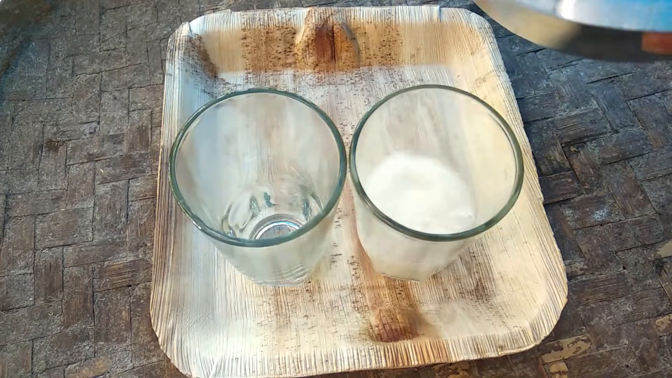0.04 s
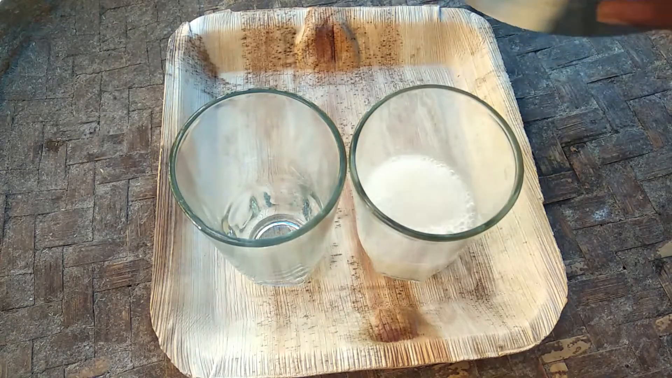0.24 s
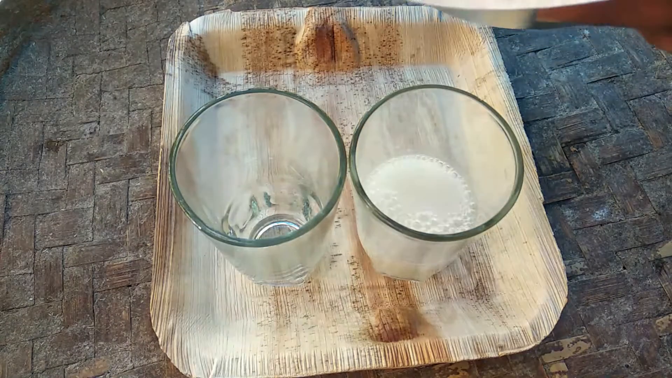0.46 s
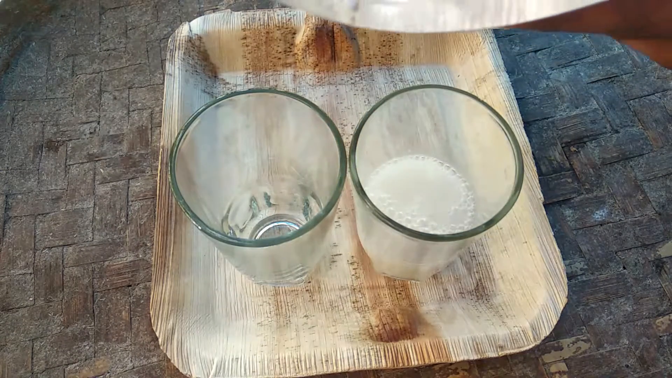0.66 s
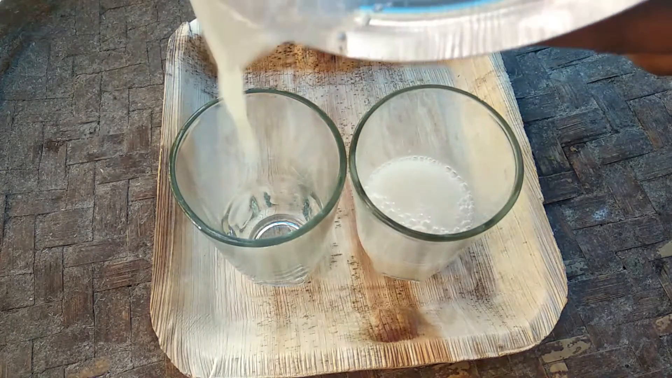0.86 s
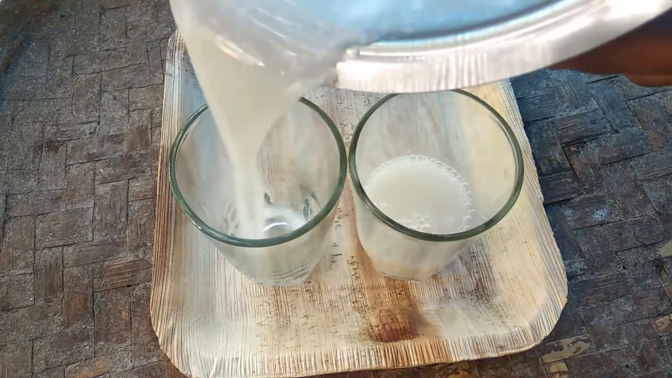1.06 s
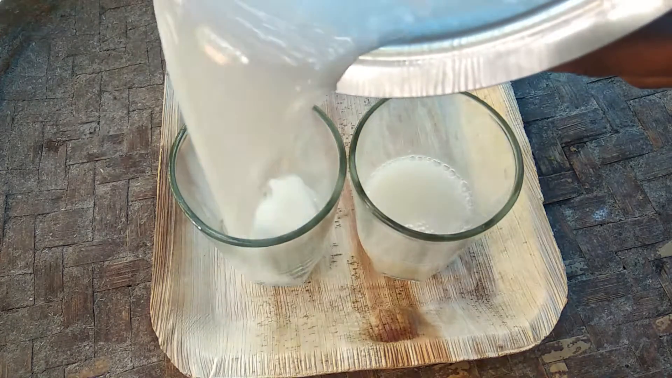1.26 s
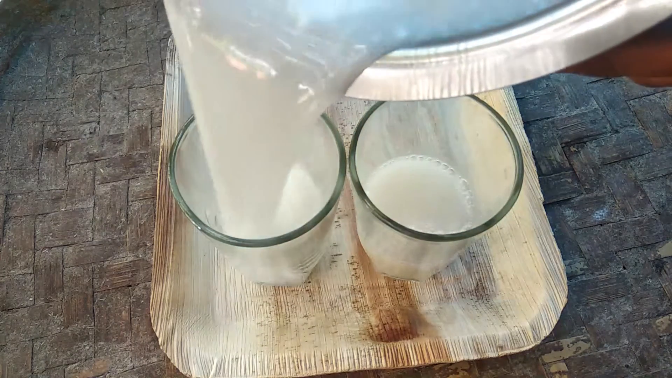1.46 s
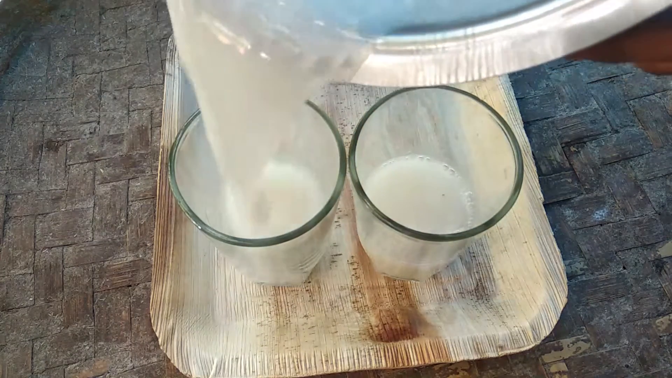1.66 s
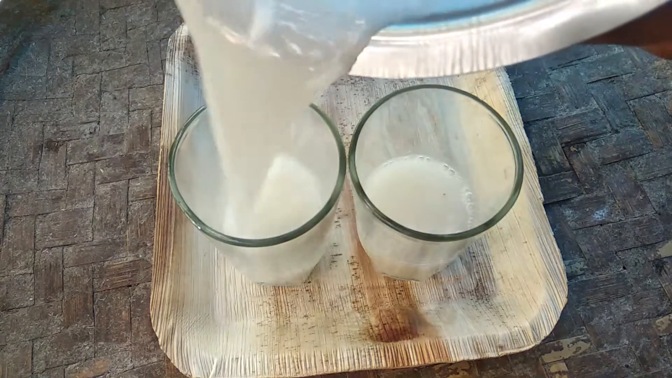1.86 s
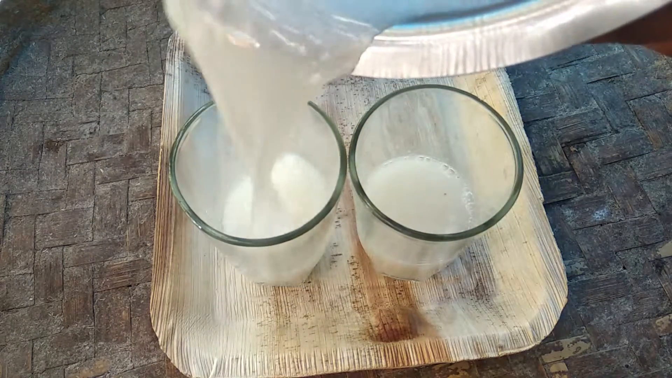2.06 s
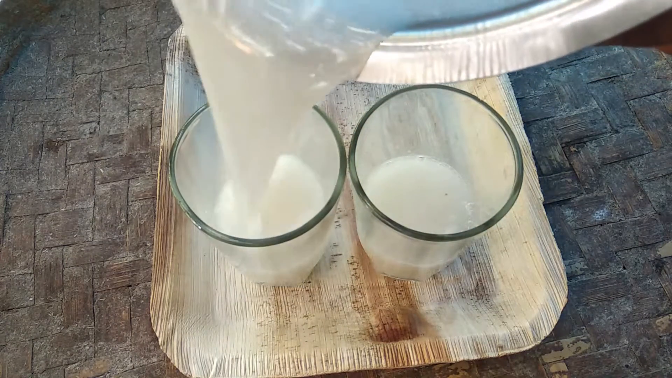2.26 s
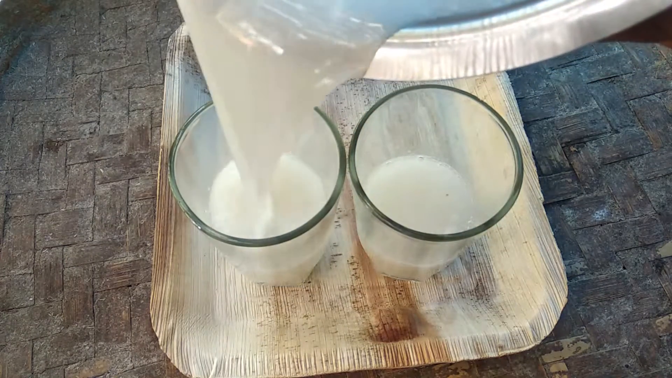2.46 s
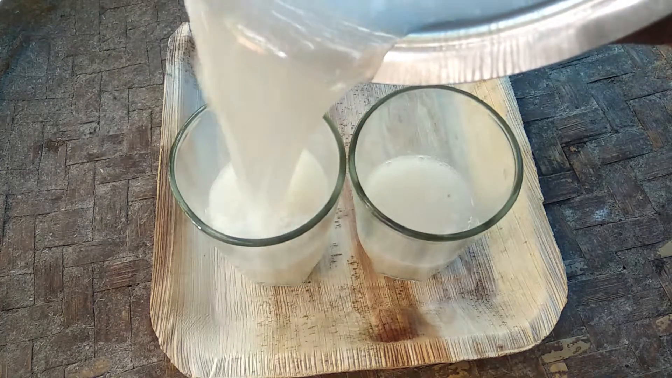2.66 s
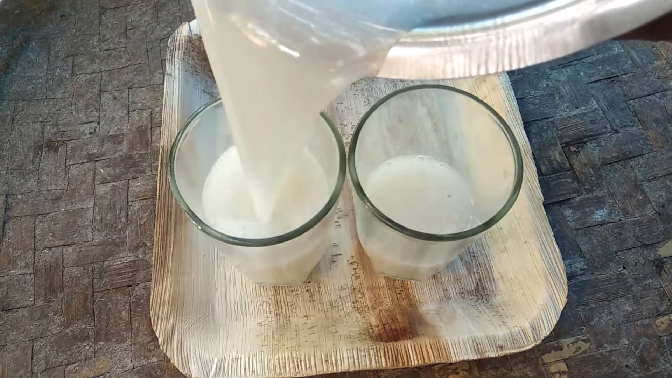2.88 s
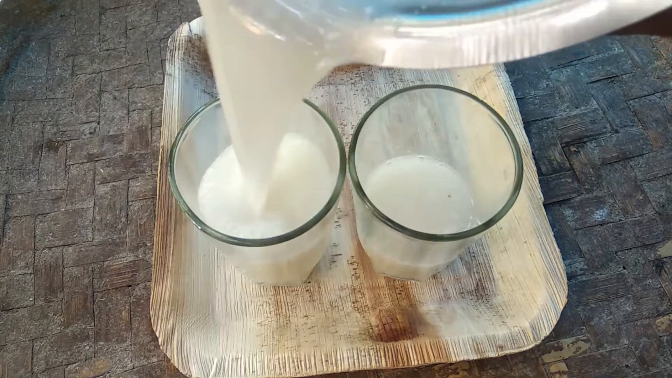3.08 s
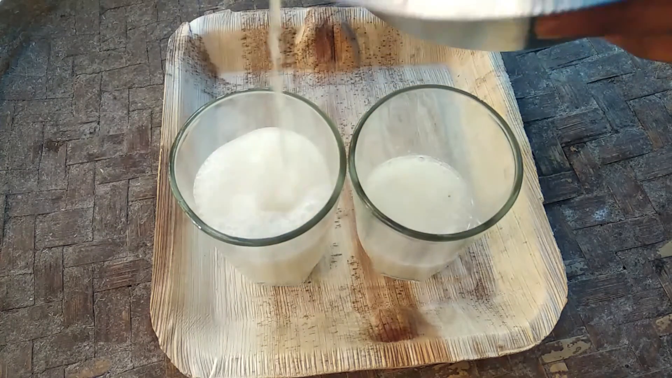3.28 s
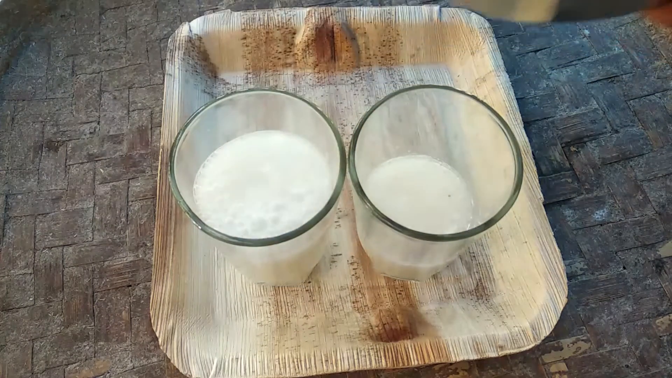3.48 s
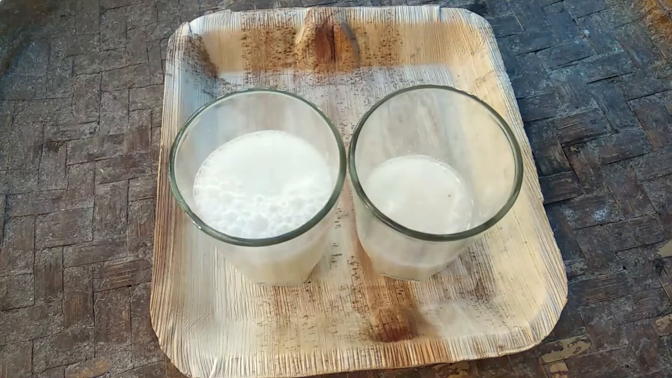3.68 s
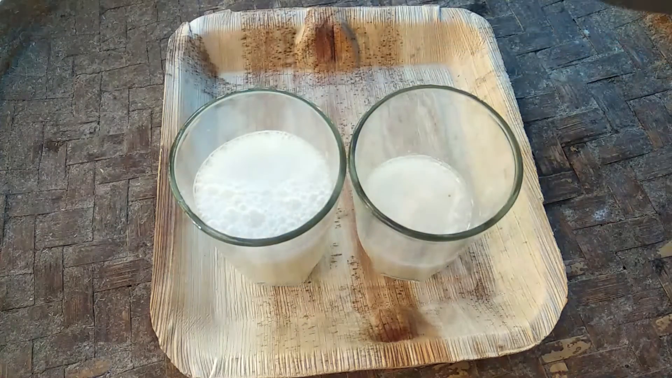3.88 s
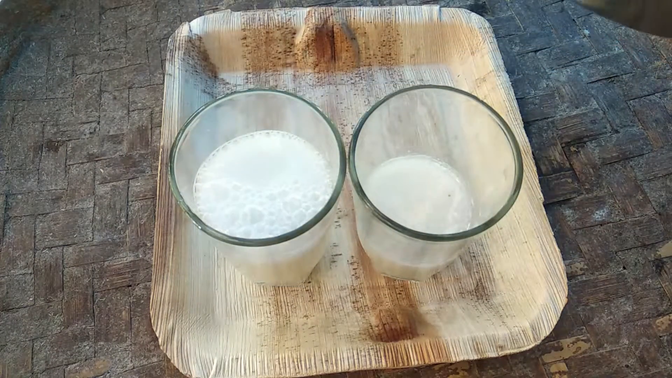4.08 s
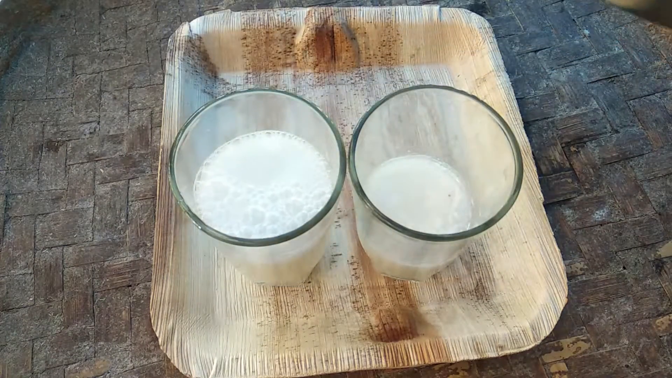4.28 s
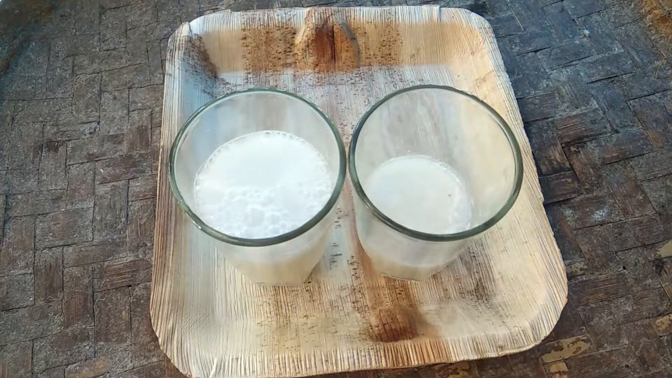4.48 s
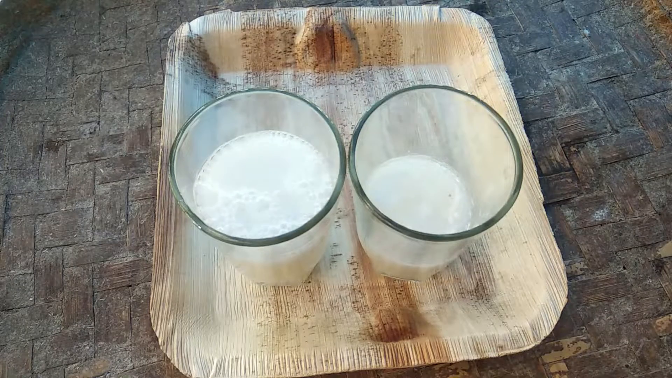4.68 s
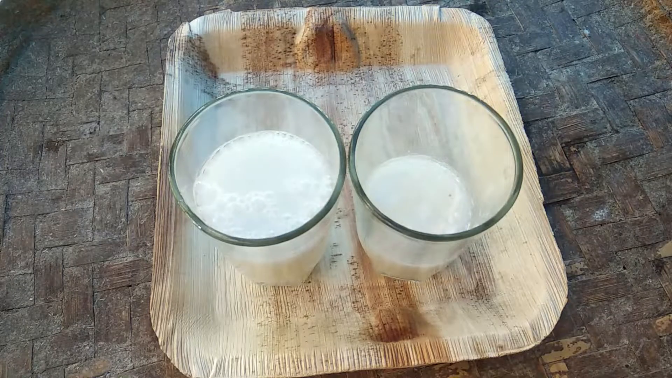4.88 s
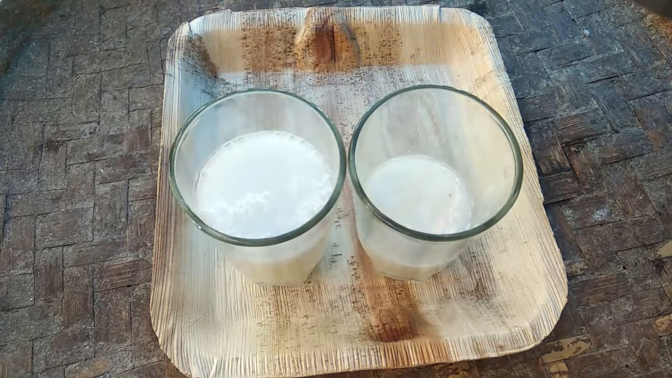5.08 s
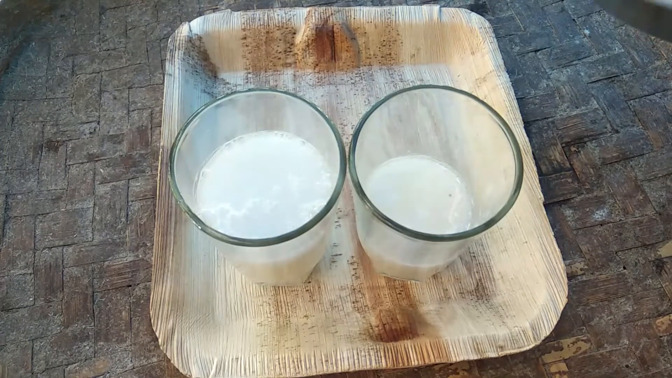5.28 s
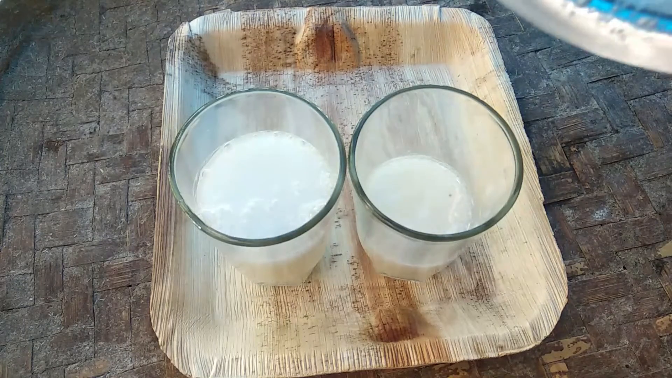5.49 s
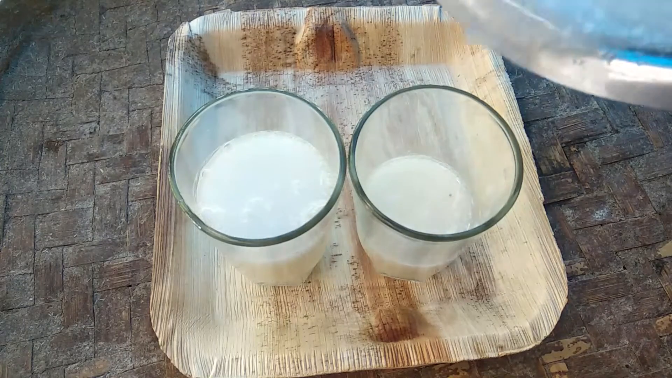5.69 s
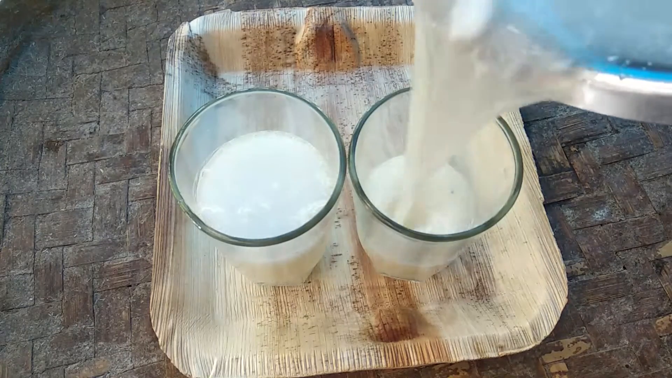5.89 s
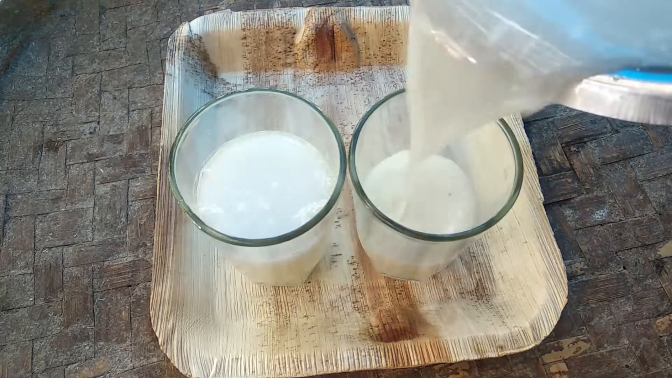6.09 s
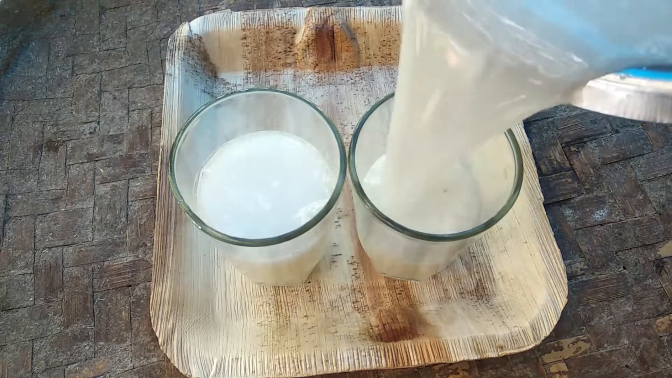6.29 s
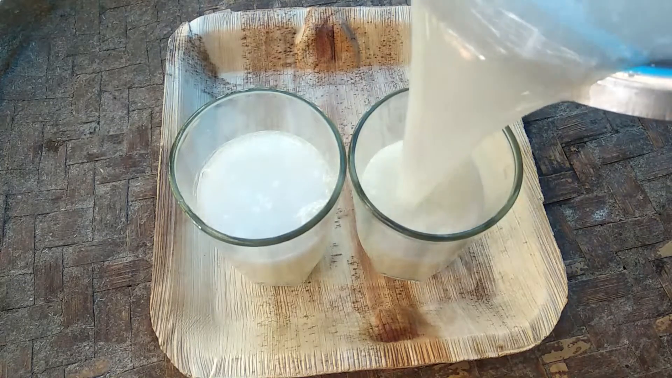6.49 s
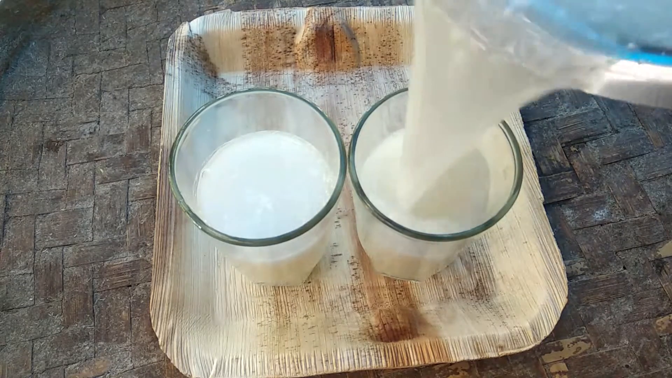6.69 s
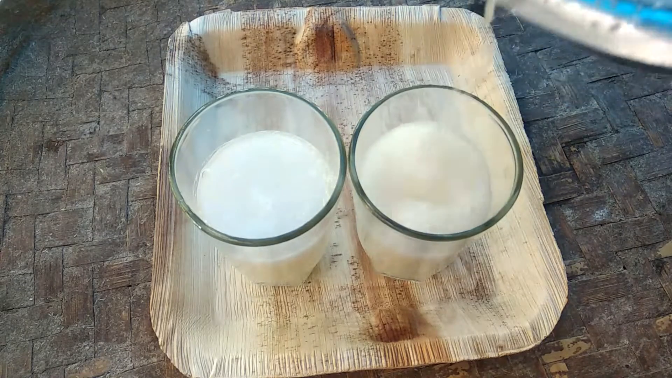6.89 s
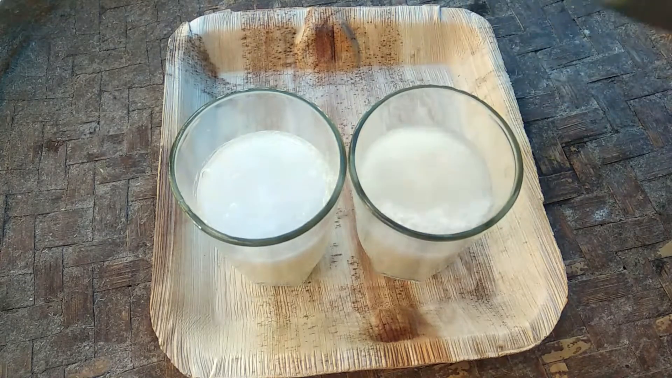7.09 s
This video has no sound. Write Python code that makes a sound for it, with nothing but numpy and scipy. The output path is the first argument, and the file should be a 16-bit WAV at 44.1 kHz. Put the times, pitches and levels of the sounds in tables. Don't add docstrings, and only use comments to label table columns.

```python
import sys
import numpy as np
from scipy import signal
from scipy.fft import rfft, irfft
from scipy.io import wavfile

SR = 44100
rng = np.random.default_rng(int(sys.argv[2]) if len(sys.argv) > 2 else 0)


def magnitude_from_level(level_db):
    exponent = np.asarray(level_db, float) / 20
    return 10 ** exponent


def bounce(signal):
    frames = np.transpose(np.atleast_2d(signal))
    limited = np.clip(frames, -1, 1)
    pcm = np.round(limited * 32767).astype(np.int16)
    wavfile.write(sys.argv[1], SR, pcm)


N = 315164


def rms_one(x):
    return x / np.sqrt(np.mean(x ** 2) + 1e-20)


def seconds():
    return np.arange(N) / SR


def in_time(rows):
    s, *columns = np.transpose(rows)
    return [np.interp(seconds(), s, c) for c in columns]


def at_hz(points, hz):
    table_hz, value = np.array(points).T
    return np.interp(np.log(hz), np.log(table_hz), value)


def drift(rate):
    r = np.exp(-80 * np.pi * rate / SR)
    chance = rng.standard_normal(N // 40 + 2002)
    slow = signal.lfilter([1], [1, -2 * r, r * r], chance)[2000:]
    return np.interp(np.arange(N) / 40, np.arange(len(slow)), rms_one(slow))


def add(out, s, piece, lead):
    i = round(s * SR) - lead
    a, b = max(i, 0), min(i + piece.shape[-1], N)
    if b > a:
        out[..., a:b] += piece[..., a - i:b - i]


def butter(order, hz, kind, x):
    return signal.sosfilt(signal.butter(order, hz, kind, fs=SR, output="sos"), x)


def peak(hz, q, x):
    return signal.lfilter(*signal.iirpeak(hz, q, fs=SR), x)


def banded_noise(spectrum, edges, alike, patchy_db, fast, together):
    out, white = 0, rng.standard_normal((2, 2, N))
    for k, (low, high) in enumerate(zip(edges, edges[1:])):
        mid, side = butter(2, [low, high], "band", white[k % 2])
        hz = np.sqrt(low * high)
        c = np.clip(at_hz(alike, hz), -1, 1)
        gain = magnitude_from_level(at_hz(spectrum, hz) + patchy_db * drift(fast) + together)
        out = out + gain * (np.sqrt(1 + c) * mid + np.sqrt(1 - c) * side * [[1], [-1]])
    return rms_one(out)


def bubbles(rows, rise):
    out, phase = np.zeros((2, N)), rng.uniform(0, 2 * np.pi, len(rows))
    for (s, peak_db, hz, ms), start in zip(rows, phase):
        length = max(ms, 1) / 1000
        lead = int(3 * rise * length * SR)
        t = np.arange(-lead, int(3 * length * SR)) / SR
        swell = (t / (rise * length)) ** 2
        decay = (np.maximum(t, 0) / ((1 - rise) * length)) ** 0.84
        shape = magnitude_from_level(peak_db) * 2 ** -np.where(t < 0, swell, decay)
        ring = np.sqrt(2) * np.sin(start + 2 * np.pi * hz * t)
        add(out, s, shape * np.array([ring, np.ones(len(t))]), lead)
    return out


def bursts(rows, alike, sharp, grain_db):
    out, size = np.zeros((2, N)), 8192
    f = np.maximum(np.arange(size // 2 + 1) * SR / size, 1)
    t = (np.arange(size) - size // 2) / SR
    for s, peak_db, hz, spread, ms, pan_db in rows:
        both, left, right, chance = rng.standard_normal((4, size))
        droplets = magnitude_from_level(grain_db * np.repeat(chance[:size // 32], 32))
        noise = droplets * (np.sqrt(alike) * both + np.sqrt(1 - alike) * np.array([left, right]))
        bell = np.exp(-(np.log2(f / hz) / (2 * max(spread, .02))) ** 2)
        noise = rms_one(irfft(rfft(noise) * bell, size))
        shape = 2 ** -np.abs(t / (max(ms, 1) / 2000)) ** sharp * np.hanning(size)
        add(out, s, magnitude_from_level(peak_db + np.array([[pan_db], [-pan_db]]) / 2) * shape * noise, size // 2)
    return out


def grains(per_s, size_db):
    sizes = magnitude_from_level(size_db * np.minimum(rng.exponential(1, N), 5)) * rng.choice([-1, 1], N)
    return rms_one(sizes * (rng.random(N) < per_s / SR))


def moving_resonance(x, hz, width_hz):
    turn, r = np.exp(2j * np.pi * np.cumsum(hz) / SR), np.exp(-np.pi * width_hz / SR)
    return rms_one((signal.lfilter([(1 - r) ** 2], [1, -2 * r, r * r], x / turn) * turn).real)


# (frequency [Hz], level [dB per Hz])
ROOM_SPECTRUM = [(18, -31), (30, 0), (54, -17), (70, 0.5), (200, -1), (313, -7), (654, -9), (829, -8.5),
                 (1370, -13.5), (2320, -12.5), (6300, -19), (7570, -10.5), (8870, -22.5), (15000, -22),
                 (16300, -33)]
# (frequency [Hz], likeness [-1..1])
ROOM_LIKENESS = [(60, 0.85), (380, 0.37), (2380, -0.16), (15000, 0.22)]


def room_tone():
    level_db = -58.5 - 0.44 * seconds()
    edges = np.geomspace(42, 16500, 23)
    return magnitude_from_level(level_db) * banded_noise(ROOM_SPECTRUM, edges, ROOM_LIKENESS, patchy_db=1.5, fast=9.8,
                                        together=.5 * drift(0.98))


# (time [s], level [dB], half length [s])
RUMBLE_SWELLS = [
    (1.8, -57, .4),
    (3.1, -56.5, 0.56),
    (5.4, -58, 0.78),
]


def rumble():
    rest_db, t = -73, seconds()
    level_db = rest_db + sum((top_db - rest_db) * np.exp(-((t - s) / half_s) ** 2)
                             for s, top_db, half_s in RUMBLE_SWELLS)
    return magnitude_from_level(level_db - 7.0) * rms_one(butter(2, [45.5, 49], "band", rng.standard_normal(N)))


# (frequency [Hz], width [Hz], level [dB])
HISS_BANDS = [(7500, 650, -69.5), (9400, 900, -74)]


def thin_hiss():
    fade = np.clip((seconds() - 4.74) / 0.82, 0, 1)
    out, hiss_db = 0, 7 - 6 * fade
    for hz, width_hz, level_db in HISS_BANDS:
        band = [hz - width_hz / 2, hz + width_hz / 2]
        noise = rms_one(butter(1, band, "band", rng.standard_normal((2, N))))
        out = out + magnitude_from_level(level_db + hiss_db + [[-1.5], [1.5]]) * noise
    return out


# (time [s], flow level [dB], level of air dragged under [dB])
EARLIER_POUR = [
    (0, -58, -42),
    (.04, -77, -62.5),
]
FIRST_POUR = [
    (1.02, -36, -73.5),
    (1.16, -40, -75.5),
    (1.22, -46, -62),
    (1.5, -35.5, -43),
    (2.2, -36.5, -40),
    (2.7, -50, -47),
    (2.95, -60.5, -51),
    (3.25, -48.5, -63),
    (3.468, -40.5, -69),
]
SECOND_POUR = [
    (5.987, -35, -45),
    (6.1, -51, -46),
    (6.25, -45, -41),
    (6.36, -72, -54),
    (6.47, -59.5, -60),
    (6.65, -97, -56),
    (6.8, -60.5, -58),
    (6.95, -44.5, -69.5),
    (7.04, -63, -69.5),
]
# (time [s], column [Hz], its rise [Hz/s], ring [Hz], its rise [Hz/s])
FILLS = [
    (0, 1180, 5, 2400, 3.5),
    (.9, 845, 161, 2500, -330),
    (5.9, 1194, 340, 3470, 5),
]


def stream():
    attack_s, release_s, still_db = 0.027, 0.127, (-84.5, -79)
    rows = []
    for p in (EARLIER_POUR, FIRST_POUR, SECOND_POUR):
        rows += [(p[0][0] - attack_s, *still_db), *p, (p[-1][0] + release_s, *still_db)]
    t, pitches = seconds(), np.zeros((2, N))
    for s, hz, rise, ring_hz, ring_rise in FILLS:
        pitches = np.where(t >= s, [hz + rise * (t - s), ring_hz + ring_rise * (t - s)], pitches)
    return *in_time(rows), *pitches


def gurgle(air_db, column_hz, lumps_db, glug_size):
    wobbling_hz = column_hz * 2 ** (0.11 * drift(24.0))
    column = moving_resonance(grains(450, size_db=1.5), wobbling_hz, width_hz=214)
    return column * (magnitude_from_level(air_db + 2.35 * lumps_db + 4.3 * drift(26.0)) + 0.35 * glug_size)


def patter(patter_db, ring_hz, lumps_db, glug_size, drop_size):
    slap = magnitude_from_level(patter_db + 1.66 * lumps_db + 4.2 * drift(36.0)) + 0.18 * glug_size + 0.19 * drop_size
    out = rms_one(butter(2, [620, 5600], "band", grains(5000, size_db=3.5)))
    for hz in np.geomspace(1500, 5600, 8):
        out = out + 0.27 * rms_one(peak(hz, 9.0, grains(70, size_db=3.5)))
    wobbling_hz = ring_hz * 2 ** (0.054 * drift(14.0))
    out = out + 0.28 * moving_resonance(grains(140, size_db=2.5), wobbling_hz, width_hz=650)
    return slap * out


# (frequency [Hz], level [dB per Hz])
SPRAY_SPECTRUM = [(2060, -36), (3500, 25), (4260, -0.5), (5060, -15.5), (8260, -13), (12200, -15),
                  (14900, -16), (16000, -7.5)]


def spray(flow_db, lumps_db):
    edges, alike = np.geomspace(4400, 16500, 11), [(3000, .5), (16000, .5)]
    return magnitude_from_level(flow_db - 2.5) * banded_noise(SPRAY_SPECTRUM, edges, alike, patchy_db=4, fast=16,
                                             together=3 * lumps_db)


# (time [s], level [dB], centre [Hz], length [ms], left over right [dB])
DRIPS = [
    (0.019, -42, 10300, 25, 13.5),
    (.059, -37, 9100, 14, 8),
    (1.037, -29, 14300, 9.9, -21),
    (4.62, -51.5, 7100, 13, 0),
    (5.487, -54.5, 9100, 9.7, 12),
]
# (time [s], level [dB], centre [Hz], length [ms])
FIRST_SPATTERS = [(.869, -48.5, 5800, 13), (1.021, -36.5, 5200, 7.3), (1.083, -19, 8100, 6.9),
                  (1.177, -25, 7910, 16), (1.225, -29.5, 9000, 34), (1.262, -33, 9220, 16),
                  (1.362, -30.5, 6900, 12), (1.553, -26.5, 7700, 14.5), (1.779, -29.5, 7820, 69),
                  (1.895, -36, 7730, 81), (1.975, -27.5, 6640, 25), (2.036, -32, 7710, 32),
                  (2.118, -36.5, 7400, 71), (2.204, -35.5, 7980, 26), (2.247, -29.5, 8440, 11),
                  (2.327, -20.5, 7980, 12.3), (2.437, -29.5, 6900, 22), (2.482, -32.5, 8100, 23),
                  (2.546, -33, 6200, 20), (2.623, -38.5, 6850, 42), (2.84, -47.5, 13500, 20),
                  (2.875, -61.5, 12500, 16), (2.977, -35, 8100, 17), (3.087, -43, 9400, 8.7),
                  (3.226, -36.5, 9800, 11.6), (3.261, -34.5, 7800, 34), (3.298, -32.5, 10800, 12.5),
                  (3.34, -35, 7900, 18), (3.402, -30, 8900, 12), (3.439, -33.5, 6500, 12)]
SECOND_SPATTERS = [(6.003, -37, 6600, 30), (6.021, -30.5, 8800, 11), (6.061, -37.5, 8800, 17),
                   (6.126, -46.5, 8570, 58), (6.185, -37.5, 9100, 45), (6.231, -40, 9400, 25),
                   (6.29, -43.5, 9100, 19), (6.336, -40, 8300, 11.6), (6.527, -43.5, 6330, 8.2),
                   (6.649, -52, 9400, 11), (6.759, -46, 10600, 54), (6.82, -45.5, 10500, 22),
                   (6.869, -38.5, 8900, 20), (6.899, -35, 9200, 80), (6.979, -25.5, 7500, 7.8),
                   (7.012, -43, 7200, 21)]


def spatters(column_hz):
    rows = [(s, level_db, hz, 0.21, ms, pan_db) for s, level_db, hz, ms, pan_db in DRIPS]
    for glass, pan_db in [(FIRST_SPATTERS, -4.5), (SECOND_SPATTERS, 5.5)]:
        for s, level_db, hz, ms in glass:
            spread_oct = np.interp(column_hz[int(s * SR)], [1000, 1150], [0.24, .45])
            rows.append((s, level_db, hz, spread_oct, ms, pan_db))
    return butter(4, 3430, "high", bursts(rows, alike=0.13, sharp=1.25, grain_db=5.5))


# (time [s], level [dB], centre [Hz], spread [octaves], length [ms])
RUSTLES = [
    (.02, -49.5, 128, 0.56, 81),
    (.66, -62, 662, 0.048, 180),
    (.9, -54, 6660, 0.59, 45),
    (1.802, -54, 81, 0.067, 51),
    (4.085, -74, 1460, 0.026, 64),
    (4.498, -60.5, 1484, 0.05, 190),
    (4.53, -59.5, 2640, 0.3, 110),
    (4.199, -53, 230, 0.74, 93),
    (5.239, -56.5, 290, 0.57, 114),
    (5.37, -66, 3400, 0.076, 110),
]


def rustles():
    return bursts([(*row, -1) for row in RUSTLES], alike=0.42, sharp=5.1, grain_db=-1.5)


GLUGS = [(1.229, -22, 1090, 5.9), (1.35, -30.5, 1090.0, 9.7), (1.371, -21, 967, 8),
         (1.453, -25.5, 820, 6.9), (1.479, -27, 817, 4.7), (1.623, -25.5, 1080, 17.3),
         (1.685, -25, 868, 10.5), (1.702, -31.7, 970, 32), (1.667, -24.5, 1050, 3.5),
         (1.764, -21.5, 1045, 3), (1.798, -25, 990, 24), (1.854, -22.5, 940, 4.4),
         (1.881, -16, 1080, 6.3), (1.98, -21, 940, 9.6), (2.055, -22.5, 900, 1.5),
         (2.076, -28, 1090, 6.1), (2.156, -30.5, 1153, 22), (2.209, -34, 1110, 4.4),
         (2.249, -24.5, 1095, 10), (2.274, -23.5, 1130, 4.5), (2.326, -20, 1114, 3.9),
         (2.353, -30, 1074, 3.7), (2.473, -26, 1130, 3.2), (2.502, -27, 1060, 4.1),
         (2.525, -31, 1190, 3.3), (2.638, -31, 1020.0, 1.9), (3.336, -30, 1020, 3.7),
         (3.359, -29, 1400, 5.2), (3.401, -39, 1100, 4.7), (3.45, -38.5, 970, 6),
         (0.024, -41.5, 1197, 17), (0.074, -42.5, 1070, 4.7), (5.999, -26.5, 1085, 2.8),
               (6.017, -30, 1230, 2.9), (6.056, -22, 1160.0, 2.5), (6.078, -27.5, 1060, 2.2),
               (6.145, -25.5, 1180, 1.6), (6.171, -35, 1240, 25), (6.234, -25, 1257, 7.1),
               (6.296, -32, 1226, 6.3), (6.435, -35.5, 1230, 6.2), (6.679, -44, 1120, 4.5),
               (6.819, -42, 1300, 7.2), (6.855, -45, 1100, 7.3), (6.901, -38.5, 1110, 6.8),
               (6.942, -43, 1374, 15), (6.981, -36, 1055, 3.9)]


def glugs():
    return bubbles(GLUGS, rise=0.64)


# (time [s], level [dB], pitch [Hz])
DROPS = [(1.347, -31, 1730), (1.376, -27, 2150), (1.427, -28.5, 2270), (1.62, -32.5, 2150),
         (1.668, -25.5, 2320), (1.764, -26, 2430), (1.854, -26, 2690), (1.977, -15.5, 3100),
         (1.993, -16.5, 4030), (2.144, -32, 1730), (2.329, -37, 2160), (2.385, -38, 1700),
         (2.621, -30.5, 3410), (2.828, -31.5, 3470), (3.022, -36.5, 3250), (3.228, -31.5, 1770),
         (3.341, -33.5, 1800), (3.407, -37, 1920), (3.438, -16.5, 4046), (5.981, -21, 3030),
         (6.004, -19, 3670), (6.17, -27, 3800), (6.204, -28, 3750.0), (6.337, -35, 2250),
         (6.415, -30, 3800), (6.76, -33, 3670), (6.85, -37.5, 1750), (6.915, -38, 1750), (6.942, -36, 2300),
         (6.98, -26.5, 3080)]


def drops():
    return bubbles([(s, level_db, hz, 6000 / hz) for s, level_db, hz in DROPS], rise=0.19)


# (time formed [s], first pitch [Hz], last pitch [Hz], sinking time [s], level [dB])
FROTH_CLOUDS = [
    (1.75, 560, 210.7, 0.27, -54),
    (5.988, 550, 294.7, 0.061, -59),
]


def froth(swing_db, lumps_db):
    t, level_db, pitch_hz = seconds(), np.full(N, -120.), np.full(N, 500.)
    for s, first_hz, last_hz, sink_s, top_db in FROTH_CLOUDS:
        new, growth_db = t > s - .3, np.minimum(206 * (t - s), 0)
        sinking_hz = last_hz + (first_hz - last_hz) * np.exp(-np.maximum(t - s, 0) / sink_s)
        level_db = np.where(new, top_db + growth_db, level_db)
        pitch_hz = np.where(new, sinking_hz, pitch_hz)
    level_db = level_db + swing_db
    pitch_hz = pitch_hz * 2 ** (0.14 * drift(5.5))
    throb = moving_resonance(grains(400, size_db=3.5), pitch_hz, width_hz=100)
    overtone = moving_resonance(grains(200, size_db=4.0), 2.254 * pitch_hz, width_hz=74)
    out = magnitude_from_level(level_db + 0.82 * lumps_db + 2.15 * drift(18.0)) * throb
    return out + magnitude_from_level(level_db - 3.0 + 4.0 * drift(20.0)) * overtone


# (time [s], level [dB], pitch [Hz], length [ms])
PLOPS = [(1.882, -33, 479, 5), (2.531, -44, 210, 10), (2.878, -43, 213, 11), (3.41, -44, 240, 41),
         (3.46, -45.5, 492, 17.4), (3.525, -54.5, 523, 12), (3.336, -35.5, 780, 4.9),
         (6.149, -39, 685, 6.3), (2.652, -47.5, 217, 14), (3.15, -56.5, 420, 12), (5.95, -55, 1165, 7.8),
         (6.006, -43, 560, 8.4), (6.15, -45.5, 347, 11), (6.3, -58, 310, 28), (6.97, -53.5, 330, 22),
         (7.062, -42, 3010, 3.8)]


def plops():
    return bubbles(PLOPS, rise=0.31)[0]


# (time [s], level [dB], pitch [Hz], length [ms])
THUDS = [
    (4.1585, -35.5, 295, 4.1),
    (5.2015, -37, 293, 2),
]


def thuds():
    return bubbles(THUDS, rise=0.42)[0]


# (frequency [Hz], width [Hz], share [0..1])
DIPS = [(580, 250, .7), (1500, 200, .6), (2020, 120, .6), (2950, 500, .7), (4050, 200, .3)]


def surface_dips(body):
    for hz, width_hz, share in DIPS:
        body = body - min(share, .95) * peak(hz, hz / width_hz, body)
    return butter(2, 620, "high", body)


def close_echoes(body):
    echo = rng.standard_normal((2, 1800)) * magnitude_from_level(-60 * np.arange(1800) / SR / .035)
    echo = signal.lfilter([1, -.8], [1], echo)
    return magnitude_from_level(-23) * signal.fftconvolve(body[None], echo, axes=1)[:, :N]


def pour():
    flow_db, air_db, column_hz, ring_hz = stream()
    lumps_db = drift(36.0)
    dry_db = 3.2 * np.minimum(air_db + 67.5, 0)
    patter_db = -45 + 0.32 * (flow_db + 43.5) + 0.033 * (air_db + 37) + dry_db
    glug, glug_size = glugs()
    drop, drop_size = drops()
    body = gurgle(air_db, column_hz, lumps_db, glug_size) + 0.89 * glug + 1.05 * drop
    body = body + patter(patter_db, ring_hz, lumps_db, glug_size, drop_size)
    body = surface_dips(body) + froth(.55 * (flow_db + 37.5) + dry_db, lumps_db) + plops()
    near = body * magnitude_from_level([[.6], [-.6]]) + close_echoes(body)
    near = near + spray(flow_db, lumps_db) + spatters(column_hz)
    lag = 4
    return np.array([np.r_[np.zeros(lag), near[0, :-lag]], near[1]])


def kitchen():
    return room_tone() + rumble() + thin_hiss() + rustles() + thuds()


def scene():
    return pour() + kitchen()


def roll_off(x):
    return signal.sosfilt(signal.butter(12, 15900, fs=SR, output="sos"), x)


def record(dry):
    mix = .7 * np.tanh(dry / .7)
    return roll_off(mix)


dry = scene()
out = record(dry)
bounce(out)
```